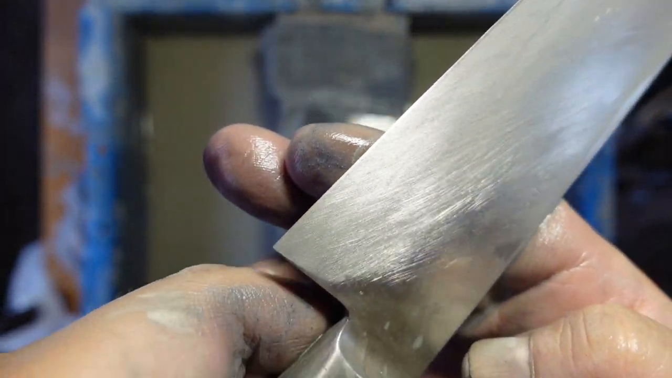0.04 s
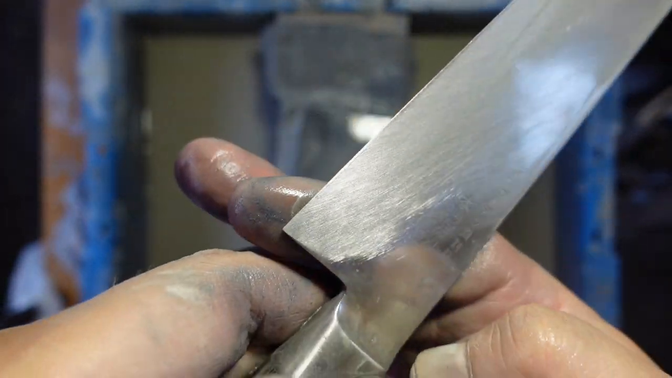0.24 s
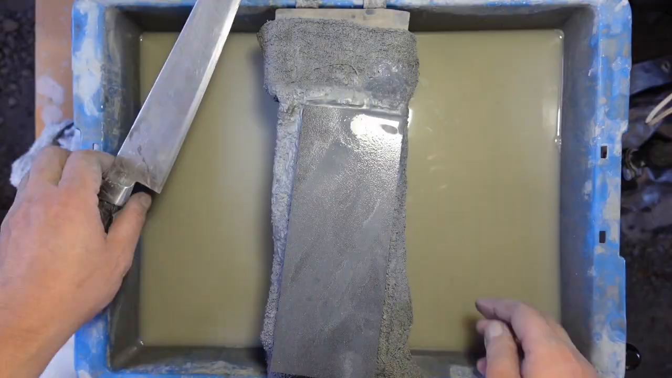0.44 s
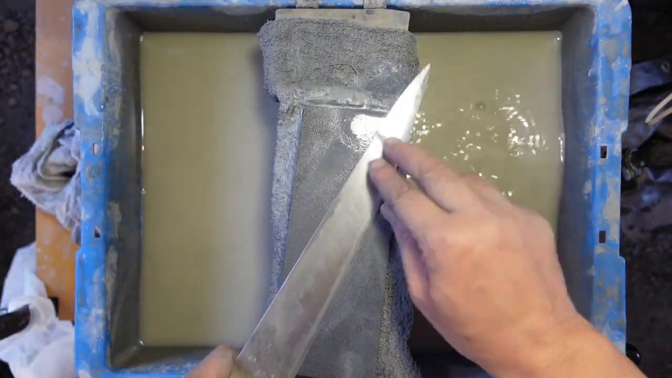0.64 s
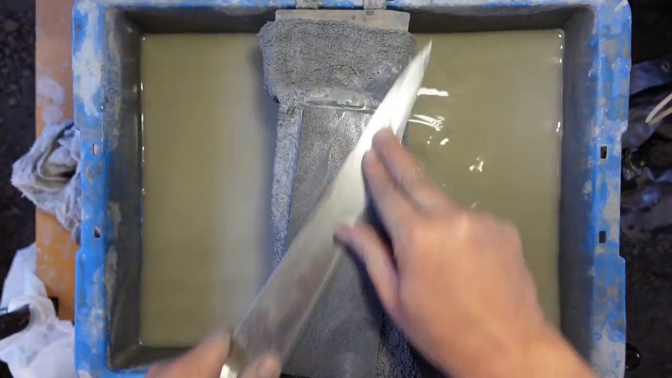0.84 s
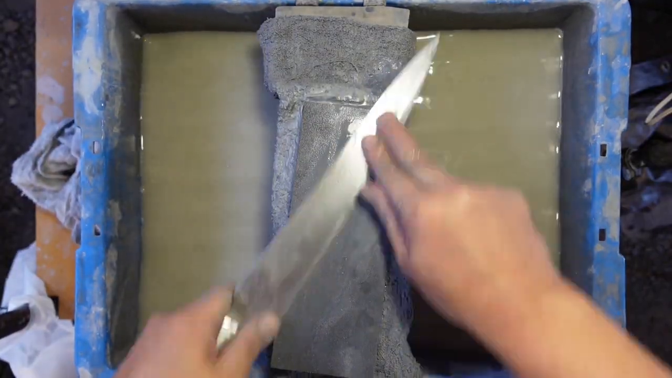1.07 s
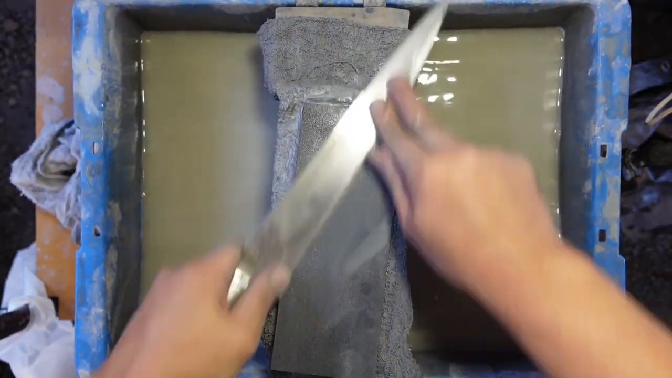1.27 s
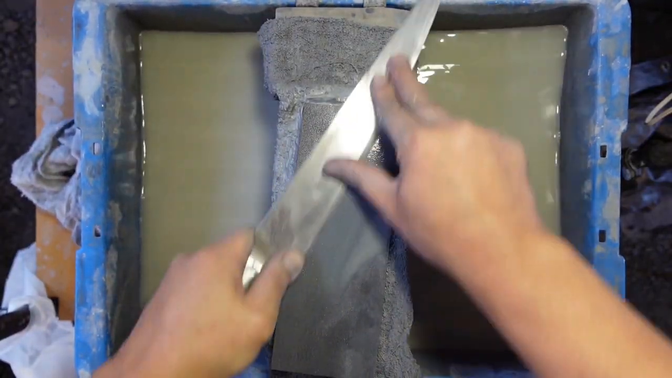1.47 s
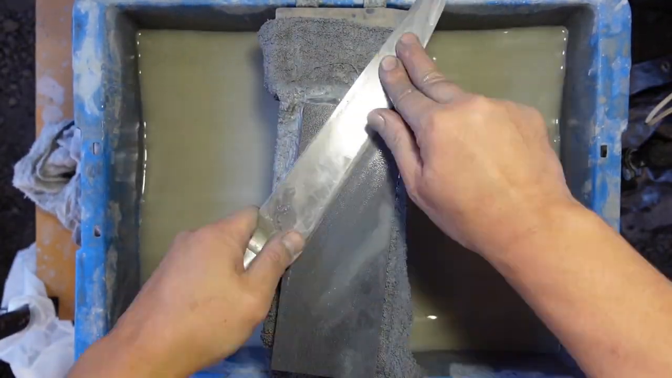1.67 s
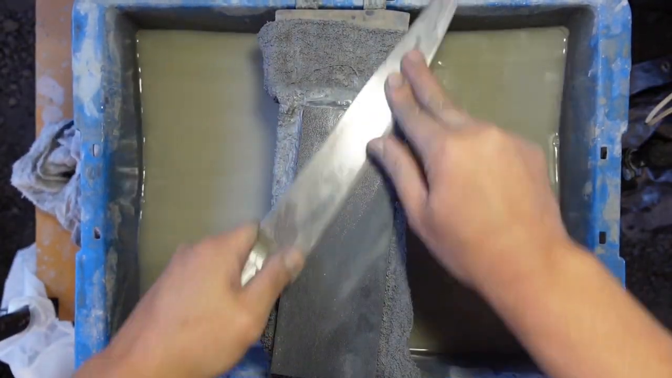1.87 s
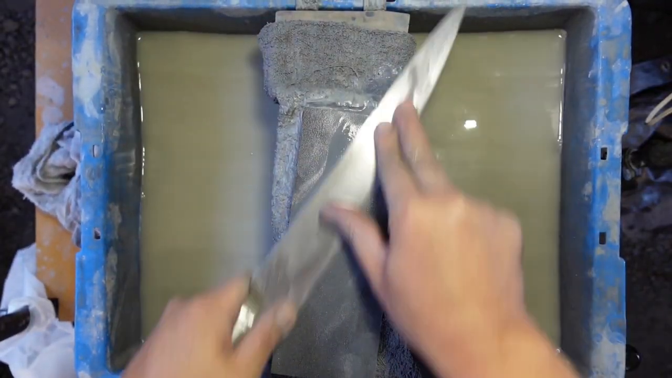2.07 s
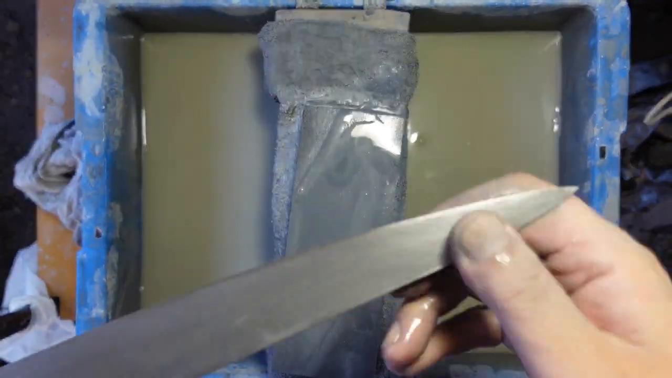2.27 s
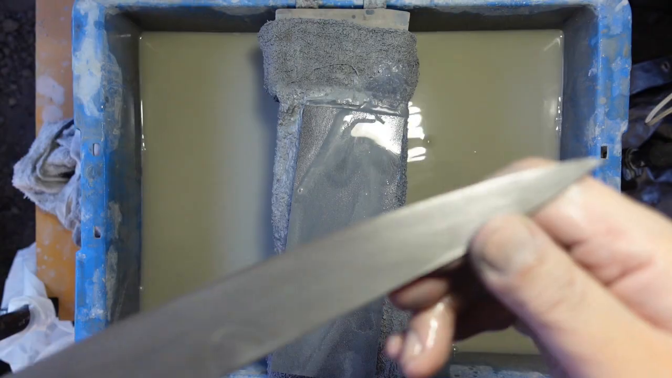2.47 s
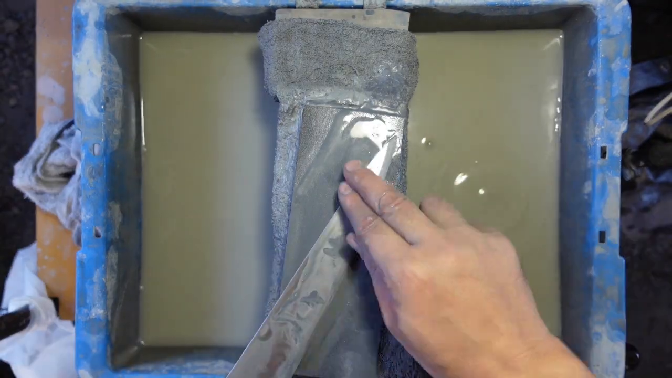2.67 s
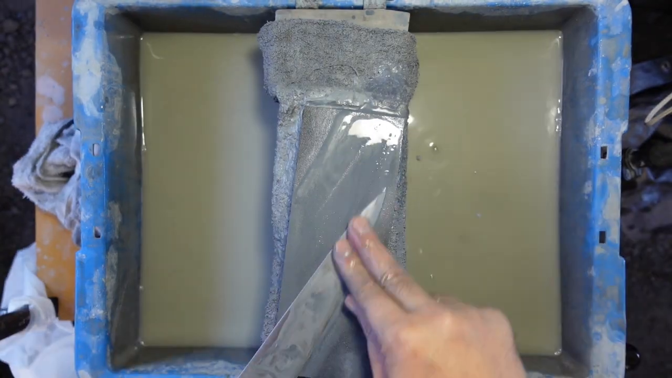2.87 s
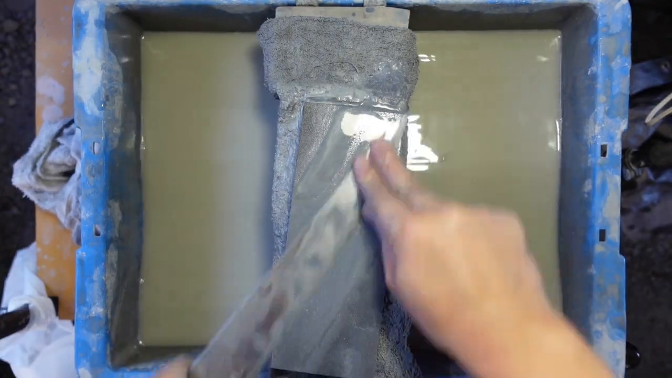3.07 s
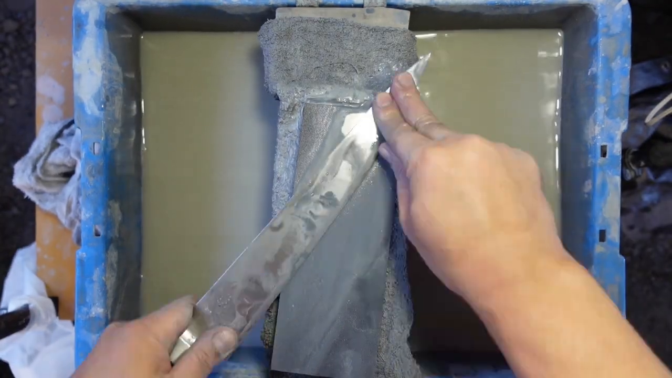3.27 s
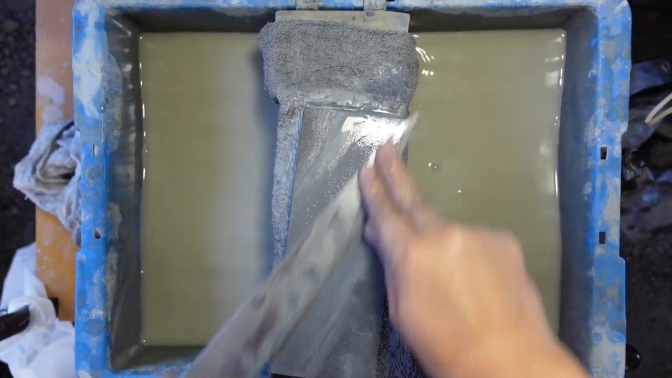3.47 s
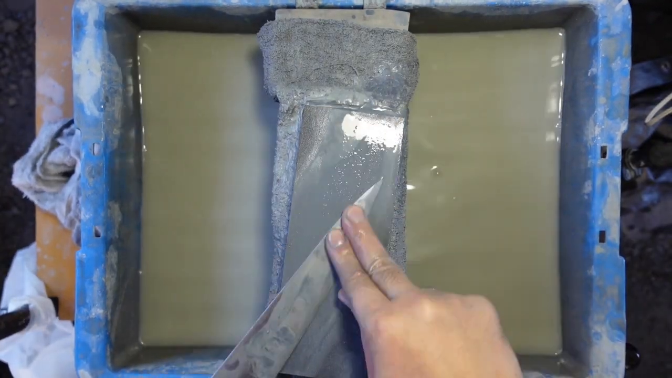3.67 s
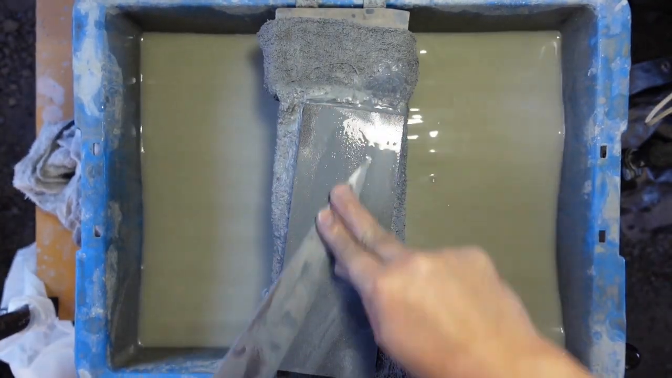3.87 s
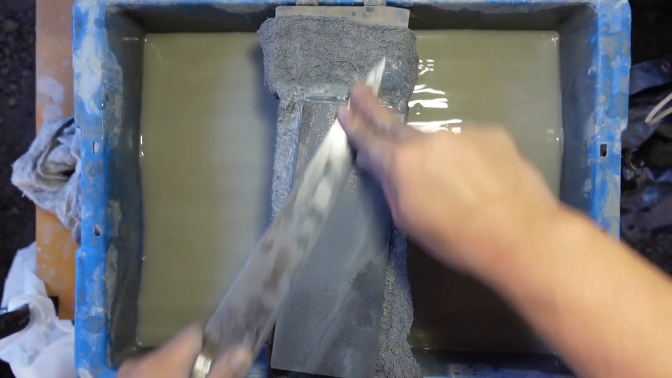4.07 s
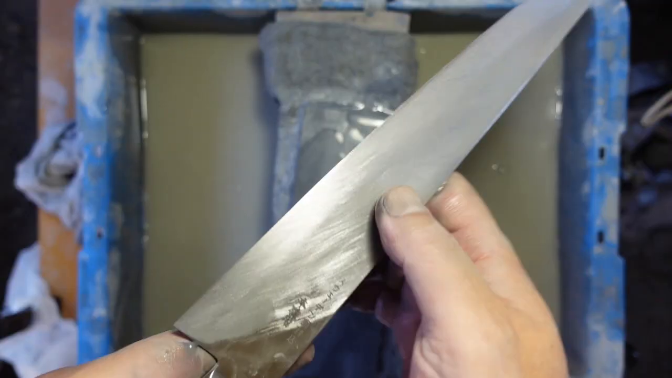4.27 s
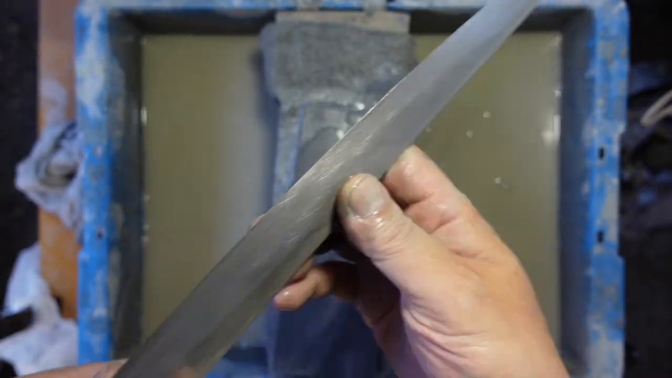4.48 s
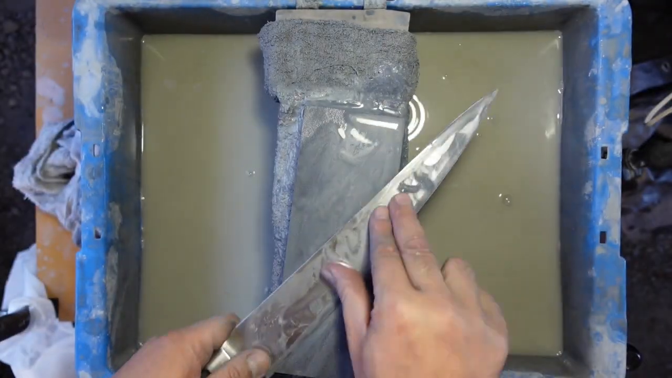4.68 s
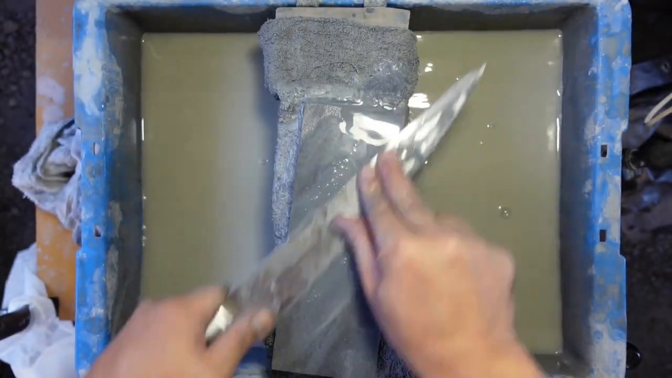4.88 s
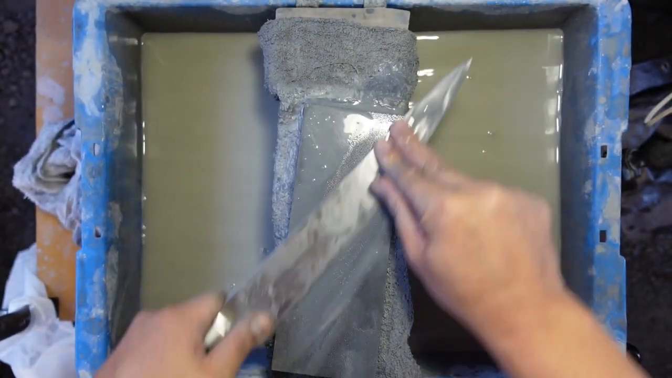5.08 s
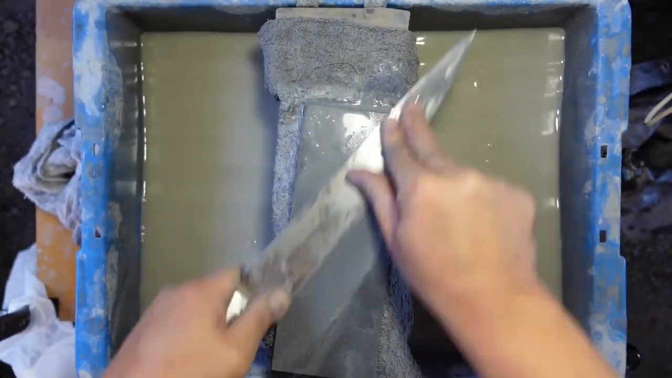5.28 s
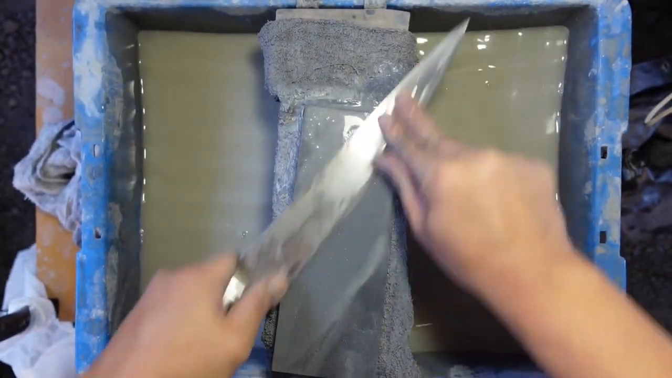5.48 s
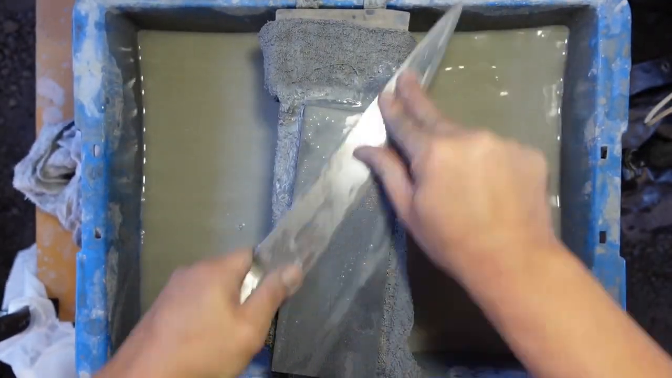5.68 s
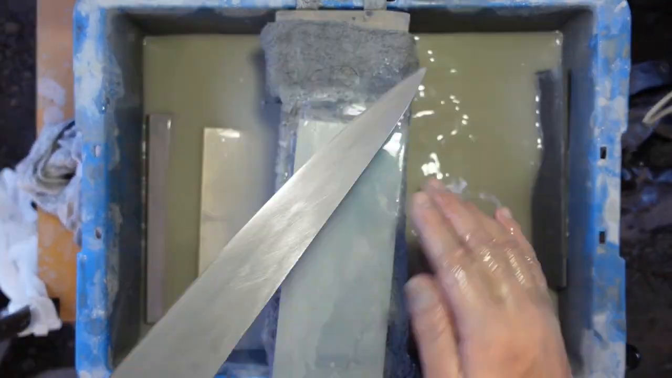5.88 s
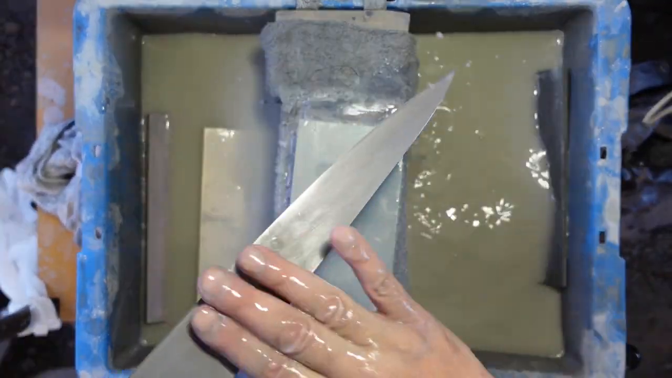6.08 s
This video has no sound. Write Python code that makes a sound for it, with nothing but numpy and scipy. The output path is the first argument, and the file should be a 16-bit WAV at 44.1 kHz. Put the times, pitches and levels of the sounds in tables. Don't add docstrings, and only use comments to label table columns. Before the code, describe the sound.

Sped-up blade sharpening: fast, fizzy wet-stone scraping in three abruptly cut bouts over faint workshop hum, ending with small drips.

```python
import sys
import numpy as np
from scipy import signal
from scipy.fft import rfft, irfft, next_fast_len
from scipy.io import wavfile
from scipy.ndimage import uniform_filter1d

SR = 44100
rng = np.random.default_rng(int(sys.argv[2]) if len(sys.argv) > 2 else 0)


def ratio_of_db(decibels):
    return 10 ** (np.asarray(decibels, float) / 20)


def to_wav(sig):
    pcm = np.clip(np.atleast_2d(sig), -1, 1) * 32767
    pcm = np.round(pcm).astype(np.int16)
    wavfile.write(sys.argv[1], SR, pcm.T)


N = 270310

# [t/s, level/dB]
HUM_LEVELS = [
    [(0.0, -50.5), (0.418, -48)],
    [(0.44, -42), (0.55, -47), (1.66, -46.5), (1.99, -40), (2.17, -44.5), (2.55, -42.5), (2.99, -43.5),
     (4.03, -42), (4.39, -49), (4.65, -46.5), (4.85, -44), (5.9, -48)],
    [(5.898, -36.5), (6.088, -35.5), (6.129, -36)],
]
# [f/Hz, level per Hz/dB]
HUM_START = [(18, -65), (30, -41), (131, -26), (204, -12.5), (345, -15.5), (430, -13), (540, -14.5),
             (1130, -24), (1350, -17), (1590, -22), (11400, -36.5), (16000, -40)]
HUM_FAST = [(20, -28), (155, -28), (280, -15), (515, -10), (680, -3), (920, -10.5), (1400, -14),
            (1860, -14.5), (2350, -16.5), (3100, -20.5), (8500, -27), (10500, -34), (16000, -39)]
HUM_END = [(30, -21), (110, -7), (215, -2), (450, -4), (700, -10), (1250, -19.5), (2150, -15), (2900, -32),
           (4500, -27), (4850, -32), (5100, -22), (5400, -30.5), (9000, -42), (16000, -62)]
# [f/Hz, level/dB]
MOTORS_START = [(101, -70), (195, -65), (220, -65), (328, -66), (394, -60), (1314, -68)]
MOTORS_END = [(101, -50), (205, -50), (265, -54), (377, -48), (533, -57), (711, -55)]

# [t/s, peak level/dB, start f/Hz, end f/Hz, time to fall 60 dB/s]
DRIPS = [
    (6.048, -34, 3400, 4700, 0.016),
    (6.049, -36, 9700, 10000, 0.009),
    (6.0995, -29, 2450, 2650, .02),
    (6.099, -35, 3000, 4000, .015),
]

# [t/s, level/dB, time to fall 60 dB/s, low f/Hz, high f/Hz]
TAPS = [(.363, -38, .04, 3500, 5800), (.441, -50, .053, 500, 5000), (.4665, -29, .008, 1200, 4800),
        (0.548, -40, .012, 4000, 12000), (.5603, -25, 0.009, 8200, 15700),
        (.619, -21.5, 0.019, 2000, 15800), (.634, -23, 0.018, 1500, 15800), (.64, -32, .02, 3000, 15000),
        (2.706, -22, .012, 4000, 12000), (4.77, -15, .004, 5000, 15000), (2.843, -15, .004, 4000, 15000),
        (.718, -16, .004, 4000, 15000), (5.871, -21, .012, 4500, 9000), (4.6635, -26, .006, 4000, 13000),
        (4.634, -31, .06, 3900, 5200), (4.512, -43, .052, 7000, 15800), (4.6226, -21, 0.024, 1200, 15800),
        (5.921, -42, .015, 2300, 4800), (5.937, -42, 0.029, 4500, 12000), (5.953, -44, .06, 3200, 4300),
        (5.972, -43, .02, 3000, 12000), (6.098, -48, .03, 4000, 12000), (5.898, -40, .04, 3000, 12000),
        (6.049, -45, .05, 3400, 4800), (.657, -22, .03, 3500, 6500), (4.536, -35, .02, 5000, 10000)]
# [t/s, level/dB, time to fall 60 dB/s, low f/Hz,
# high f/Hz]
RUBS = [(.345, -41, 0.16, 900, 1580), (.476, -33.5, .047, 634, 770), (0.479, -34, 0.062, 1050, 1350),
        (.35, -55, .08, 220, 320), (1.97, -60, .12, 65, 110), (2.04, -59, .15, 65, 130),
        (2.15, -60, .1, 100, 150), (0.498, -43.5, 0.8, 800, 1240), (0.51, -50, 0.52, 5000, 15800),
        (2.2, -49, 1.8, 2000, 2600), (2.52, -48, 1.9, 1950, 2600), (2.605, -47, 0.13, 8800, 15800),
        (2.659, -33.5, 0.18, 860, 1100), (2.664, -34, 0.18, 1590, 2120), (2.656, -27.5, 0.23, 3000, 15800),
        (2.696, -25.5, .1, 4000, 15800), (2.738, -34, 0.18, 2500, 15800), (4.262, -46, 1.6, 580, 950),
        (4.524, -38, 0.05, 4500, 11000)]
# [start t/s, end t/s, level/dB, low f/Hz, high f/Hz]
SWIPES = [
    (.352, .418, -48.5, 1500, 6500),
    (.474, .503, -39, 1800, 4800),
    (.477, .504, -42, 5000, 15800),
    (2.704, 2.719, -24.5, 3800, 11000),
]
# [t/s, peak level/dB, f/Hz, time to fall 60 dB/s]
PINGS = [(.466, -35, 4200, .03), (.619, -27, 1800, .03), (.619, -29, 3050, 0.04), (0.635, -28, 1690, 0.026),
         (4.6228, -18, 4500, 0.054), (4.623, -22, 5340, .04), (.482, -33, 680, .06), (2.668, -33, 905, .07),
         (2.672, -35, 1075, .06), (5.937, -29, 6100, 0.058), (5.937, -36, 5000, .03),
         (5.972, -27, 5050, 0.034), (5.972, -31, 3580, 0.027)]
# [t/s, peak level/dB, ring f/Hz]
KNOCKS = [(0.676, -22, 1100), (0.711, -25, 3070), (1.029, -24, 2580), (1.13, -24, 2580), (1.18, -26, 700),
          (1.376, -24, 826), (1.424, -22, 1760), (1.483, -25, 910), (1.567, -36, 875), (1.761, -26, 1260),
          (1.846, -38, 850), (1.949, -25, 650), (2.079, -20, 630), (2.658, -28, 950), (2.901, -24, 2400),
          (3.02, -22, 2840), (3.103, -17, 2750), (3.242, -27, 2800), (3.648, -18, 2760), (4.626, -27, 2990),
          (4.67, -23.5, 1190), (4.698, -30, 765), (4.749, -26, 1970), (4.82, -16, 2040), (4.933, -26, 2300),
          (5.115, -19, 1980), (5.211, -21.5, 2570), (5.306, -19, 2750), (5.464, -24, 1980),
          (5.766, -28, 1720)]

# [turn that starts it t/s, level/dB at the turn, early, in the middle, late]
FIRST_BOUT = [(0.649, -45, -21.5, -24.0, -24.5), (0.698, -38, -18.0, -18.0, -19.5),
              (0.755, -46, -20.0, -22.5, -21.5), (0.802, -38, -20.5, -19.5, -22.0),
              (0.849, -71, -22.5, -21.5, -21.5), (0.895, -41, -19.0, -20.5, -21.0),
              (0.943, -40, -20.5, -22.5, -22.0), (0.992, -38, -20.5, -19.0, -22.0),
              (1.043, -45, -22.5, -22.0, -22.5), (1.09, -34, -22.0, -20.5, -21.0),
              (1.141, -44, -21.0, -23.0, -22.5), (1.189, -37, -23.0, -21.5, -22.0),
              (1.238, -35, -21.5, -22.5, -23.0), (1.287, -33, -22.5, -24.0, -22.0),
              (1.335, -53, -26.0, -26.0, -27.5), (1.385, -45, -23.5, -22.0, -20.5),
              (1.433, -35, -21.0, -23.5, -24.5), (1.48, -37, -24.5, -23.0, -22.0),
              (1.526, -41, -22.5, -23.5, -25.5), (1.573, -40, -26.5, -24.0, -23.0),
              (1.619, -39, -20.5, -22.5, -24.0), (1.668, -42, -22.5, -20.5, -21.0),
              (1.714, -42, -21.0, -24.5, -22.0), (1.757, -40, -20.5, -21.0, -21.0),
              (1.807, -48, -21.5, -22.0, -21.5), (1.853, -35, -20.0, -19.5, -18.5),
              (1.9, -44, -22.0, -22.0, -22.0), (1.947, -34, -20.5, -20.5, -21.5),
              (1.997, -46, -21.5, -22.5, -20.5), (2.042, -35, -20.0, -20.5, -21.5),
              (2.091, -40, -21.5, -21.5, -22.5), (2.137, -35, -21.0, -21.5, -22.0)]
SECOND_BOUT = [(2.772, -47, -41, -43, -43), (2.812, -56, -20.0, -19.0, -18.0),
               (2.861, -41, -18.5, -20.0, -21.0), (2.9, -36, -22.5, -22.0, -20.5),
               (2.943, -46, -18.0, -19.5, -22.5), (2.985, -40, -24.0, -22.5, -22.5),
               (3.028, -46, -20.0, -21.0, -21.0), (3.071, -37, -24.5, -22.0, -20.5),
               (3.117, -44, -18.5, -24.0, -22.5), (3.16, -38, -22.0, -21.0, -21.0),
               (3.206, -38, -21.5, -24.0, -22.5), (3.248, -39, -23.0, -23.5, -22.0),
               (3.294, -41, -20.5, -22.5, -20.5), (3.338, -38, -22.0, -21.5, -23.0),
               (3.386, -42, -21.5, -23.0, -22.0), (3.429, -34, -21.5, -21.5, -20.5),
               (3.473, -44, -22.0, -24.5, -21.0), (3.517, -32, -22.5, -23.0, -24.0),
               (3.565, -45, -25.5, -25.5, -23.0), (3.607, -37, -22.5, -22.5, -25.0),
               (3.657, -46, -25.0, -26.5, -21.0), (3.699, -38, -21.0, -23.0, -24.0),
               (3.748, -40, -22.5, -25.5, -23.0), (3.794, -37, -21.5, -22.0, -22.0),
               (3.842, -37, -24.0, -26.0, -24.5), (3.886, -38, -20.5, -20.5, -23.5),
               (3.933, -48, -23.0, -25.0, -21.5), (3.975, -40, -24.0, -22.0, -24.5),
               (4.022, -56, -23.0, -24.0, -23.5), (4.067, -38, -24.0, -22.5, -23.0),
               (4.114, -45, -21.5, -26.5, -24.5), (4.159, -38, -23.0, -21.5, -23.5),
               (4.207, -39, -24.5, -27.5, -28.0), (4.251, -34, -28, -28, -28)]
THIRD_BOUT = [(4.631, -36, -27, -30, -31), (4.662, -42, -29, -29, -29), (4.685, -56, -27.0, -19.5, -20.0),
              (4.738, -49, -21.0, -20.5, -19.0), (4.779, -39, -20.0, -21.0, -19.0),
              (4.828, -40, -20.5, -23.0, -23.0), (4.878, -33, -21.0, -21.5, -22.0),
              (4.925, -42, -21.5, -22.0, -22.5), (4.969, -36, -22.5, -23.5, -22.5),
              (5.021, -49, -24.5, -20.5, -22.5), (5.077, -40, -20.0, -20.5, -23.5),
              (5.123, -49, -22.5, -23.0, -23.0), (5.169, -38, -20.5, -22.0, -22.0),
              (5.222, -34, -21.5, -21.5, -23.5), (5.272, -38, -22.0, -21.0, -22.0),
              (5.322, -44, -20.5, -21.5, -22.5), (5.369, -35, -22.0, -23.5, -23.0),
              (5.42, -45, -22.5, -23.0, -23.0), (5.469, -40, -25.0, -24.5, -23.0),
              (5.52, -46, -22.0, -23.0, -26.0), (5.571, -42, -21.5, -24.0, -23.5),
              (5.621, -42, -23.0, -24.5, -22.0), (5.666, -34, -19.5, -20.0, -21.5),
              (5.713, -37, -23.0, -24.5, -20.5), (5.762, -37, -20.5, -22.5, -22.5),
              (5.817, -71, -21.5, -20.5, -21.0), (5.863, -35, -20.5, -24.5, -23.5)]
BOUT_ENDS = [2.178, 4.259, 5.898]
# [t/s, level/dB]
PRESSURE = [
    [(0.648, 2), (0.72, -0.5), (0.82, -4.5), (1.1, -1), (1.3, -2), (1.6, -2.5), (1.85, 1), (2.178, 3)],
    [(2.772, 0), (2.812, -5), (2.826, -0.5), (3.2, 0), (3.8, -0.4), (4.05, 0.5), (4.259, -1.5)],
    [(4.63, -2.5), (4.7, -1.2), (4.8, 2.2), (4.9, 0.4), (5.5, -1.5), (5.75, 0.5), (5.898, -1)],
]
# [blade over hiss level/dB, upper body level/dB, lower body level/dB, extra on the pull/dB]
GRIPS = [(-12, -40.5, -43, 0.8), (-11, -38, -44, 2), (-11, -38.5, -43, 1.4)]
# [level/dB at the turn, early, in the middle, late]
BITE_DB = (-1.5, 0.8, -0.3, 0.0)
# [f/Hz, level per Hz/dB]
HISS = [(3240, -51.5), (5500, -9.5), (7130, -4), (7860, -5), (9920, -3.5), (12500, 0), (14500, 4.2),
        (16500, -6.5)]
# [f/Hz, width/Hz, level/dB]
BLADE = [(4192, 450, 1), (4910, 440, 3), (3900, 580, -9.5)]
UPPER_BODY = [(1874, 425, 3), (2740, 530, 0.5), (1560, 540, -9), (3200, 880, 1)]
LOWER_BODY = [(700, 440, -3.5), (900, 318, 5), (449, 240, -7.5), (1200, 330, -1.5)]
# [start t/s, end t/s]
DROPOUTS = [
    (2.18, 2.194),
    (4.606, 4.621),
    (5.925, 5.934),
]

PICK_UP_S, STALL_S = 0.0046, 0.0058
PULL_STALL_S = 0.008
USUAL_STALL_DB = 14.0
DWELL_S_PER_DB = 0.00008
FIRST_FULL_S, FULL_DB = 0.007, -20.2
ROUNDING = 0.33
BLADE_FOLLOWS, LOWER_FOLLOWS = 0.45, 1.17
FREE_BLADE_DB, FREE_BLADE_S = 3.5, 0.2
EVEN_S, EVEN_SHARE = 0.025, 0.6
RUMBLE_DB, RUMBLE_HZ = -31.0, 190
TAP_RISE_S = 0.00095
RUB_RISE_S, RUB_RISE_SHARE = 0.011, 0.042
SWIPE_RISE_S, SWIPE_T60_S = 0.004, 0.03


def rms_one(x):
    return x / np.sqrt(np.mean(x ** 2) + 1e-20)


def along(rows, column):
    rows = np.array(rows)
    return ratio_of_db(np.interp(np.arange(N) / SR, rows[:, 0], rows[:, column], left=-200, right=-200))


def drift(rate):
    r = np.exp(-20 * np.pi * rate / SR)
    chance = rng.standard_normal(N // 10 + 4002)
    slow = signal.lfilter([1], [1, -2 * r, r * r], chance)[4000:]
    return np.interp(np.arange(N) / 10, np.arange(len(slow)), rms_one(slow))


def pair(draw, side_db):
    unlike = signal.lfilter([1, -1], [1, -.93], draw())
    return draw() + ratio_of_db(side_db) * unlike * np.array([[1], [-1]])


def colour(x, spectrum):
    hz, db = np.transpose(spectrum)
    size = next_fast_len(N)
    bins = np.maximum(np.arange(size // 2 + 1) * SR / size, 1)
    gain = ratio_of_db(np.interp(np.log(bins), np.log(hz), db))
    return rms_one(irfft(rfft(x, size) * gain, size)[..., :N])


def band_pass(x, low_hz, high_hz):
    return rms_one(signal.sosfilt(signal.butter(2, [low_hz, high_hz], "band", fs=SR, output="sos"), x))


def patchy(x, patchy_db):
    cells = signal.stft(x, nperseg=512)[2]
    chance = rng.standard_normal(cells.shape[1:])
    fine = rms_one(uniform_filter1d(uniform_filter1d(chance, size=2, axis=0), size=3, axis=1))
    broad = rms_one(uniform_filter1d(uniform_filter1d(chance, size=20, axis=0), size=2, axis=1))
    return signal.istft(cells * ratio_of_db(patchy_db * fine + 1.1 * broad), nperseg=512)[1][..., :N]


def evened(x):
    power = uniform_filter1d((x ** 2).mean(axis=0), size=int(EVEN_S * SR))
    return rms_one(x / (power + 1e-9) ** (EVEN_SHARE / 2))


def resonate(x, modes, flicker_db):
    out = 0
    for k, (hz, width, db) in enumerate(modes):
        r = np.exp(-np.pi * width * 1.5 / SR)
        section = [1, 0, -1, 1, -2 * r * np.cos(2 * np.pi * hz / SR), r * r]
        ring = rms_one(signal.sosfilt([section, section], x))
        out = out + (-1) ** k * ratio_of_db(db + flicker_db * drift(38)) * ring
    return rms_one(out)


def motors(lines):
    t = np.arange(N) / SR
    return sum(ratio_of_db(db + 1.8 * drift(9.2)) * np.sin(2 * np.pi * hz * t) for hz, db in lines)


def workshop():
    air = 0
    for level, spectrum in zip(HUM_LEVELS, (HUM_START, HUM_FAST, HUM_END)):
        noise = pair(lambda: rng.standard_normal(N), side_db=-11.5)
        tone = rms_one(patchy(colour(noise, spectrum), patchy_db=1.5))
        air = air + along(level, 1) * ratio_of_db(0.3 + 1.1 * drift(26)) * tone
    t = np.arange(N) / SR
    start = motors(MOTORS_START) * (t < HUM_LEVELS[0][-1][0])
    end = motors(MOTORS_END) * (t > BOUT_ENDS[-1])
    return air + start + end


def drips():
    out, t = np.zeros(N), np.arange(1200) / SR
    for s, db, start_hz, end_hz, t60 in DRIPS:
        hz = end_hz + (start_hz - end_hz) * np.exp(-t / .003)
        out[round(s * SR):][:len(t)] += ratio_of_db(db - 60 * t / t60) * np.sin(2 * np.pi * np.cumsum(hz) / SR)
    return out


def touches():
    out, t = np.zeros((2, N + 16000)), np.arange(16000) / SR
    rows = [(TAP_RISE_S, TAP_RISE_S, *row) for row in TAPS]
    for row in RUBS:
        rise = RUB_RISE_S + RUB_RISE_SHARE * row[2]
        rows.append((rise, rise, *row))
    for s, end, db, low_hz, high_hz in SWIPES:
        rows.append((SWIPE_RISE_S, end - s, s, db, SWIPE_T60_S, low_hz, high_hz))
    for rise, held, s, db, t60, low_hz, high_hz in rows:
        noise = pair(lambda: rng.standard_normal(len(t)), side_db=-19.0)
        shape = np.minimum(t / rise, 1) * ratio_of_db(-60 * np.maximum(t - held, 0) / t60)
        first = round(s * SR)
        out[:, first:first + len(t)] += ratio_of_db(db) * shape * band_pass(noise, low_hz, high_hz)
    t = np.arange(N) / SR
    return out[:, :N] * ((t < HUM_LEVELS[0][-1][0]) | (t > HUM_LEVELS[1][0][0]))


def pings():
    out, t = np.zeros(N), np.arange(3000) / SR
    for s, db, hz, t60 in PINGS:
        apart = rng.standard_normal(3)
        ragged = rms_one(uniform_filter1d(rng.standard_normal(len(t)), size=90))
        neighbours = np.sin(2 * np.pi * hz * np.outer(1 + 0.05 * apart, t)).sum(axis=0)
        cluster = np.sin(2 * np.pi * hz * t) + 0.45 * neighbours
        fall = ratio_of_db(-60 * t / t60 + 4.0 * np.exp(-t / 0.0025) + 2.5 * ragged)
        out[round(s * SR):][:len(t)] += ratio_of_db(db - 6.0) * fall * (1 - np.exp(-t / 0.0003)) * cluster
    return out


def knocks():
    out, t = np.zeros(N), np.arange(2000) / SR
    for s, db, hz in KNOCKS:
        shape = (1 - np.exp(-t / 0.00064)) * ratio_of_db(-60 * t / 0.032)
        beside = 0.55 * np.sin(2 * np.pi * hz * (1 + 0.11 * rng.choice([-1, 1])) * t)
        out[round(s * SR):][:len(t)] += ratio_of_db(db - 4.0) * shape * (np.sin(2 * np.pi * hz * t) + beside)
    return out


def grit(per_s=16000, spread_db=2.4):
    sizes = ratio_of_db(spread_db * np.minimum(rng.exponential(1, N), 4)) * rng.choice([-1, 1], N)
    clicks = sizes * (rng.random(N) < per_s / SR)
    return rms_one(clicks) + 0.67 * rng.standard_normal(N)


def strokes():
    speed = share = upper = lower = 0
    t = np.arange(N) / SR
    bouts = (FIRST_BOUT, SECOND_BOUT, THIRD_BOUT)
    for bout, lift, pressure, grip in zip(bouts, BOUT_ENDS, PRESSURE, GRIPS):
        blade_db, upper_db, lower_db, pull_db = grip
        turn, db = np.array(bout)[:, 0], np.array(bout)[:, 1:]
        after = np.append(turn[1:], lift)
        middle = (turn + after) / 2
        pulling = (len(turn) - np.arange(len(turn))) % 2

        slowing = np.where(pulling, PULL_STALL_S, STALL_S)
        dwell = DWELL_S_PER_DB * (db[:, 1] - db[:, 0] - USUAL_STALL_DB)
        times = [PICK_UP_S + dwell, slowing + np.append(dwell[1:], 0)]
        rise, fall = np.clip(times, .001, (after - turn) / 3)
        rise[np.argmax(db[:, 2] > FULL_DB)] += FIRST_FULL_S

        points = np.append(np.transpose([turn, turn + rise, middle, after - fall]).ravel(), lift)
        gains = ratio_of_db(ROUNDING * np.append(db + BITE_DB, db[-1, -1]))
        speed = speed + np.interp(t, points, gains, left=0, right=0) ** (1 / ROUNDING)

        load = along(pressure, 1) * ratio_of_db(pull_db * np.interp(t, middle, pulling))
        free = ratio_of_db(FREE_BLADE_DB * np.exp(-np.maximum(t - turn[0], 0) / FREE_BLADE_S))
        share = share + ratio_of_db(blade_db) * free * load ** BLADE_FOLLOWS * (load > 1e-6)
        upper = upper + ratio_of_db(upper_db) * load
        lower = lower + ratio_of_db(lower_db) * load ** LOWER_FOLLOWS
    return speed, share, upper, lower


def scrape():
    speed, share, upper_load, lower_load = strokes()
    chatter = ratio_of_db(1.27 * drift(150))
    common = chatter * grit()
    unlike = chatter * grit() * np.array([[1], [-1]])
    bright, dull = common + ratio_of_db(-17) * unlike, common + ratio_of_db(-21) * unlike

    hiss = ratio_of_db(0.7) * speed * evened(patchy(colour(bright, HISS), patchy_db=2.9))
    blade = speed * share * evened(patchy(resonate(dull, BLADE, 0.92), patchy_db=1.0))

    steady = np.minimum(speed / (uniform_filter1d(speed, size=4000) + 1e-6), 1.4)
    upper = upper_load * steady ** 0.25 * resonate(dull, UPPER_BODY, 3.45)
    lower = uniform_filter1d(lower_load, size=300) * steady ** 0.55 * resonate(dull, LOWER_BODY, 3.35)

    rumble = band_pass(common[None], 50, RUMBLE_HZ)
    bench = ratio_of_db(RUMBLE_DB + 2.5 * drift(9)) * uniform_filter1d(lower_load, size=1500) * rumble
    return hiss + blade + ratio_of_db(0.1) * upper + ratio_of_db(-1.0) * lower + bench


def scene():
    return workshop() + drips() + touches() + pings() + knocks() + scrape()


def starve_side(x, margin_db, loud_db):
    mid, side = (x[0] + x[1]) / 2, (x[0] - x[1]) / 2
    cells = signal.stft([mid, side], nperseg=2048)[2][:, :1024]
    power = (abs(cells) ** 2).reshape(2, 32, 32, -1).mean(axis=2)
    whole = power[0].mean(axis=0)
    luck = 2.5 * rng.standard_normal(power[1].shape) + 3.4 * rng.standard_normal(len(whole))
    faint = power[1] * ratio_of_db(2 * luck) < whole * ratio_of_db(2 * margin_db)
    weak = faint & (whole > ratio_of_db(2 * loud_db))
    kept = cells[1] * np.repeat(~weak, 32, axis=0)
    side = signal.istft(np.vstack([kept, kept[-1:]]), nperseg=2048)[1][:N]
    return np.array([mid + side, mid - side])


def roll_off(x):
    return signal.sosfilt(signal.butter(12, 16940, fs=SR, output="sos"), x)


def record(dry):
    treble = signal.sosfilt(signal.butter(2, 4000, "high", fs=SR, output="sos"), dry)
    tilted = dry + .125 * treble * np.array([[-1], [1]])
    dull = signal.sosfiltfilt(signal.butter(6, 4200, fs=SR, output="sos"), tilted)
    lost = sum((np.arange(N) > a * SR) & (np.arange(N) < b * SR) for a, b in DROPOUTS)
    lost = uniform_filter1d(1. * lost, size=60)
    top_cut = signal.ellip(12, .5, 65, 15870, fs=SR, output="sos")
    cut = signal.sosfilt(top_cut, tilted + lost * (dull - tilted))
    mix = starve_side(cut, margin_db=-18, loud_db=-63.0)
    return roll_off(mix)


dry = scene()
out = record(dry)
to_wav(out)
```